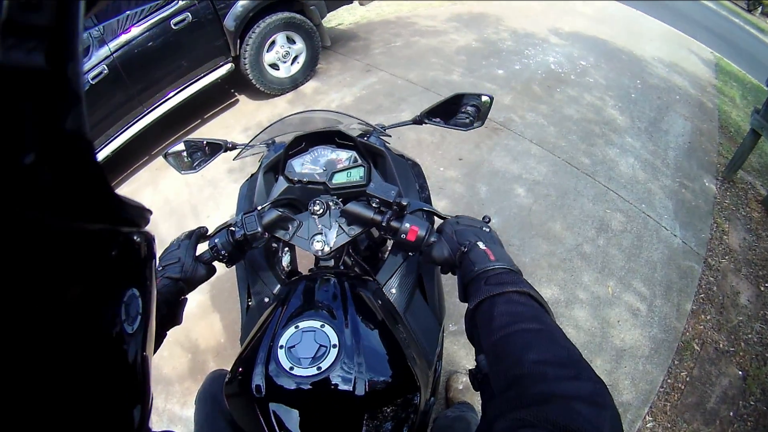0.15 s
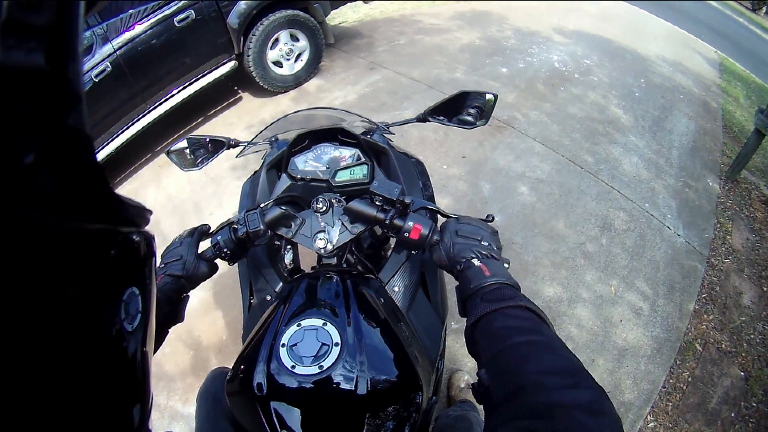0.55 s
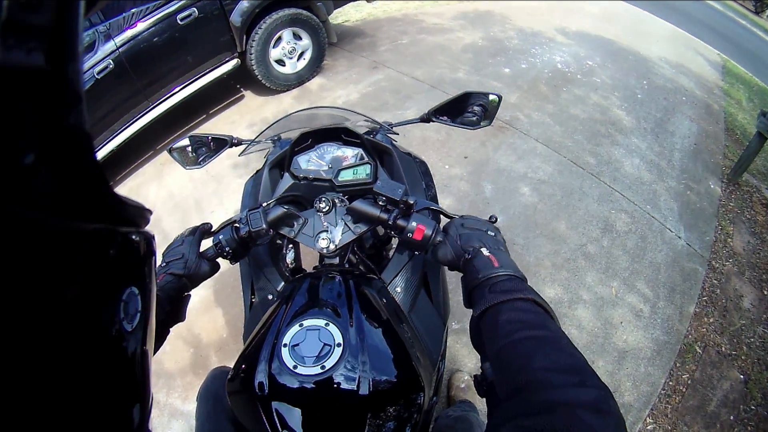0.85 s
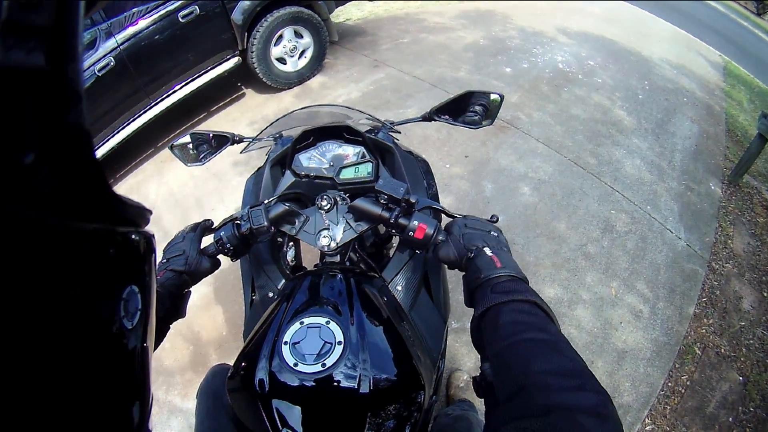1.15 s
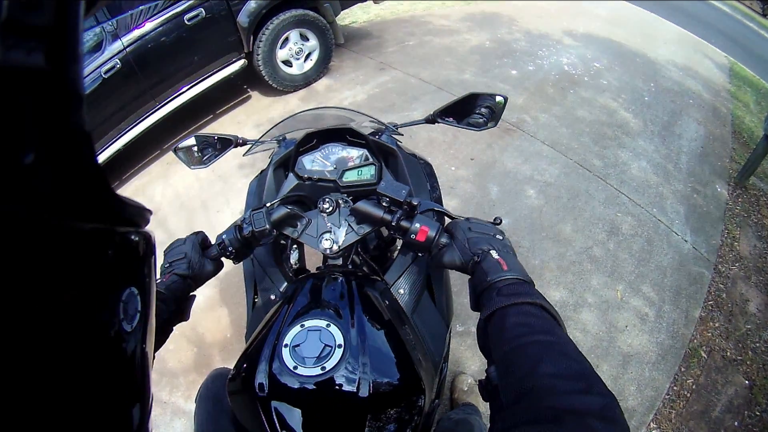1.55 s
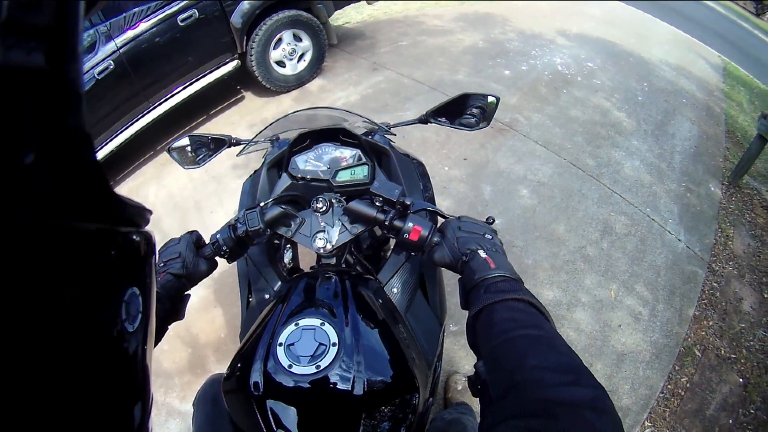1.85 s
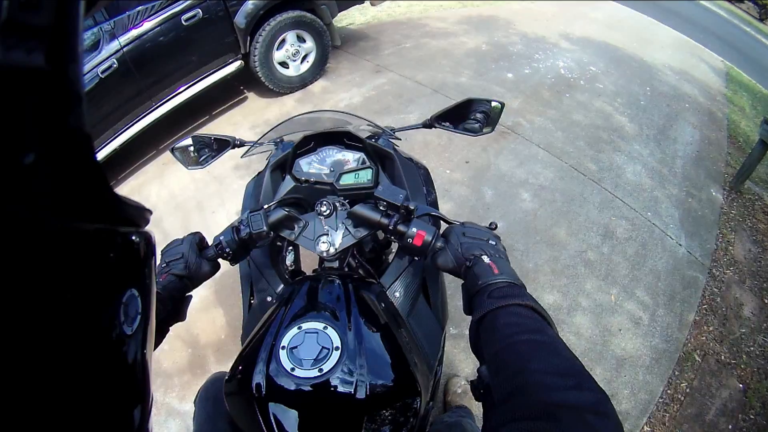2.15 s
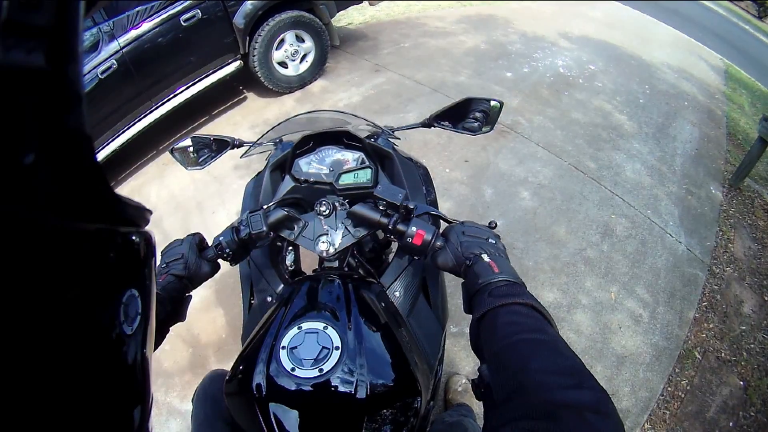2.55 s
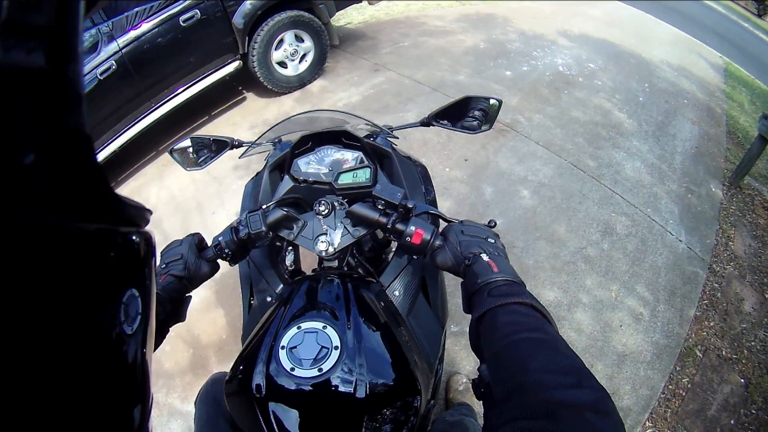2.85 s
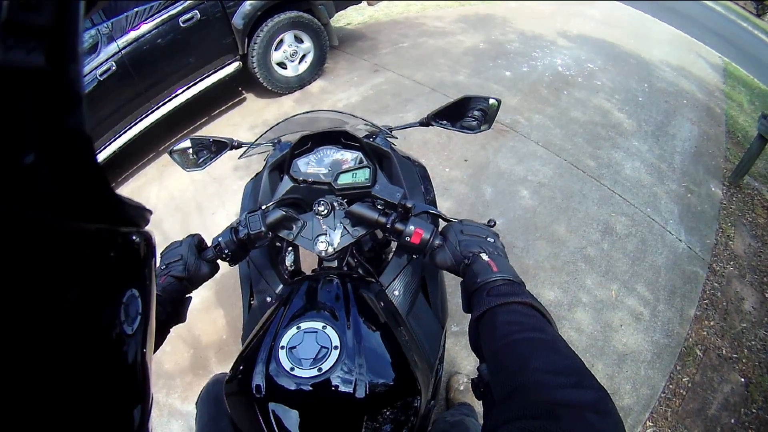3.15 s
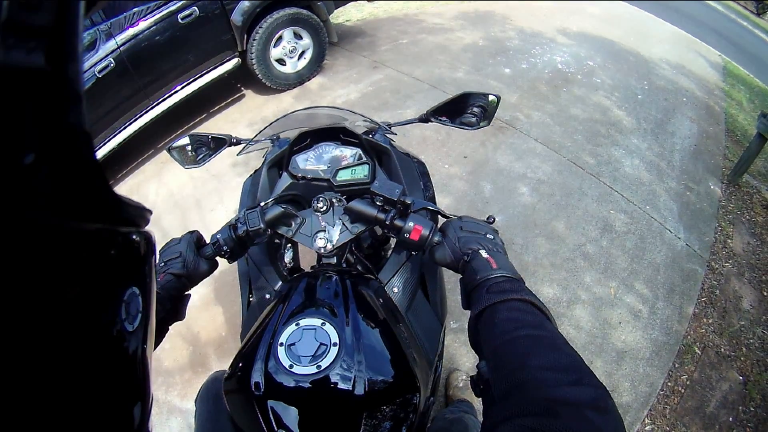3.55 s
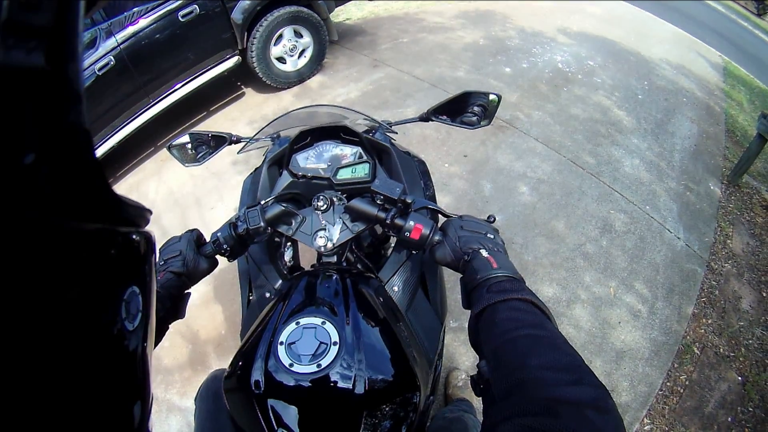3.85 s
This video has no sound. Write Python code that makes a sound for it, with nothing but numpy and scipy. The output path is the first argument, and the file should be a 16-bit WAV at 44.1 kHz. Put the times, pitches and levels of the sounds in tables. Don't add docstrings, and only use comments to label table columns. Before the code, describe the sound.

Close rider's-ear view of a twin-cylinder motorcycle: rattly idle, two barking revs, popping slow-down, short idle, then shutdown with switch clicks, cloth rubbing and faint bird whistles over low wind on an open driveway.

```python
import sys
import numpy as np
from scipy import signal
from scipy.fft import rfft, irfft
from scipy.io import wavfile
from scipy.ndimage import uniform_filter1d

SR = 44100
rng = np.random.default_rng(int(sys.argv[2]) if len(sys.argv) > 2 else 0)


def attenuation_scalar(level_db):
    decades = np.asarray(level_db, float) / 20
    return 10 ** decades


def store_pcm(level_fs):
    pcm = np.round(np.clip(level_fs, -1, 1) * 32767).astype(np.int16)
    wavfile.write(sys.argv[1], SR, np.atleast_2d(pcm).T)


N = 176400
TIME = np.arange(N) / SR
IDLE_DB = -26


def evened(x):
    return x / np.sqrt(np.mean(x ** 2) + 1e-20)


def curve(points):
    return np.interp(TIME, *np.transpose(points))


def filtered(x, order, hz, kind="low"):
    return signal.sosfilt(signal.butter(order, hz, kind, fs=SR, output="sos"), x)


def coloured(points):
    f, db = np.transpose(points)
    hz = np.fft.rfftfreq(N, 1 / SR)
    gain = attenuation_scalar(np.interp(np.log(hz + 1), np.log(f + 1), db))
    return evened(irfft(rfft(rng.standard_normal(N)) * gain, N))


def resonate(x, hz, width):
    turn = np.exp(2j * np.pi * hz * np.arange(len(x)) / SR)
    r = np.exp(-np.pi * width / SR)
    smooth = signal.lfilter([1], [1, -2 * r, r * r], x / turn)
    return evened((turn * smooth).real)


def ring(train, hz, t60, lag, swell=0.0018):
    t = np.maximum(np.arange(-441, SR // 2) / SR - lag, 0)
    tone = (1 - np.exp(-t / swell)) * attenuation_scalar(-60 * t / t60) * np.sin(2 * np.pi * hz * t)
    return signal.oaconvolve(train, tone)[441:N + 441]


def dip(train, width, lag):
    t = np.arange(-882, 883) / SR - lag
    return -signal.oaconvolve(train, np.exp(-.5 * (t / width) ** 2), "same")


# (t/s, speed/rpm)
CRANK_SPEED = [(0, 1571.9), (.401, 1562.3), (.5, 2177.4), (.673, 3332.2), (.908, 2340.4), (1.0, 3065.4),
               (1.12, 4050.4), (1.301, 3196), (1.498, 2384.8), (1.7, 1794), (1.85, 1506.3), (1.98, 1500.6),
               (2.1, 1584.4), (2.3, 1584.2), (2.556, 1629.7), (2.7, 905), (2.9, 240), (2.95, 0)]
# (t/s, level/dB)
FIRING_STRENGTH = [(0, -31.5), (.39, -30), (.45, -18), (.55, -14), (.64, -12.5), (.71, -19.5), (.845, -31),
                   (.875, -21), (.93, -19.5), (.98, -13.5), (1.08, -12), (1.15, -19), (1.3, -22),
                   (1.5, -23.5), (1.65, -30.5), (1.72, -25), (1.8, -29), (2.6, -31.5)]
# (from t/s, to t/s)
NO_FIRING = [
    (.709, .835),
    (.88, .915),
    (1.16, 1.3),
    (1.33, 1.353),
    (1.37, 1.425),
    (1.438, 1.487),
    (1.51, 1.57),
    (1.63, 1.65),
    (2.55, 4),
]


def crank():
    krpm, load_db = curve(CRANK_SPEED) / 1000, curve(FIRING_STRENGTH)
    cycle = .3755 + np.cumsum(krpm) * 1000 / 120 / SR
    first, second = [np.diff(np.floor(cycle - gap), prepend=np.floor(cycle[0] - gap - 1e-4))
                     for gap in (0, .243)]
    strokes = (first + second) * attenuation_scalar(0.1 * rng.standard_normal(N))
    cut = sum((TIME > a) & (TIME < b) for a, b in NO_FIRING) > 0
    fired = strokes * ~cut
    pumped = strokes * cut * attenuation_scalar(-1.5 * first)
    return krpm, load_db, fired, pumped


# (f/Hz, level/dB, t60/s, share of effort followed)
BOOM_TONES = [(53.75, 3.5, 0.19, 0), (104.8, -3.5, 0.089, 0)]
# (f/Hz, level/dB, t60/s, share of effort followed)
BARK_TONES = [(296.4, 5, 0.042, 0.6), (347.6, -3, 0.04, 1.374), (404, -17.5, 0.025, 1.58),
              (504.6, -21, 0.096, 1.2), (536, -23.5, 0.091, 1), (725, -25.5, 0.087, 1.64),
              (894, -31, 0.18, 0.46)]
# (f/Hz, level/dB, t60/s, rise/dB per 1000 rpm)
PUMP_TONES = [(54.2, -28, .35, 2.5), (100.7, -30.5, 0.075, 4.5), (149, -38, 0.076, 2.5),
              (260, -42, 0.066, 8), (320, -44.5, 0.075, 8)]
EARLIER_STROKES = (-.032, -.0135)


def exhaust(krpm, load_db, fired, pumped):
    effort_db, fast = load_db - IDLE_DB, krpm - 1.5
    pump_lag = .005
    out = dip(fired * attenuation_scalar(load_db - 1), .0008, 0)
    out += dip(pumped * attenuation_scalar(-24.5 + 2.5 * fast), .0025, pump_lag)
    out -= dip(fired * attenuation_scalar(load_db - 2.5), .0024, .0038)
    for hz, db, t60, share in BOOM_TONES:
        out += ring(fired * attenuation_scalar(IDLE_DB + db + share * effort_db), hz, t60, -0.0011)
    for hz, db, t60, share in BARK_TONES:
        out -= ring(fired * attenuation_scalar(IDLE_DB + db + share * effort_db), hz, t60, -0.00055, 0.0023)
    for hz, db, t60, rise in PUMP_TONES:
        out -= ring(pumped * attenuation_scalar(db + rise * fast), hz, t60, pump_lag - 0.092 / hz)
    out -= dip(pumped * attenuation_scalar(-20 + 3 * fast) * (krpm > 1.3), 0.0014, 0.00054)
    out = filtered(out, 2, 1100)
    for hz, db, t60, _ in BOOM_TONES:
        for start in EARLIER_STROKES:
            out += ring((TIME == 0) * attenuation_scalar(IDLE_DB + db + 0.5), hz, t60, start)
    return out


# (f/Hz, level/dB per Hz)
GAS_SPECTRUM = [(90, -28.5), (200, -7), (500, -16), (1000, -24.5), (2600, -41.5), (8000, -50.5),
                (13000, -56), (15600, -77)]


def gas_roar(krpm, load_db, puff):
    flow, flow_db = coloured(GAS_SPECTRUM), uniform_filter1d(load_db - IDLE_DB, 3000)
    low = signal.sosfiltfilt(signal.butter(1, 650, fs=SR, output="sos"), flow)
    roar = low * (1 + 0.45 * puff) * attenuation_scalar(0.76 * flow_db)
    hiss = (flow - low) * (1 + 0.37 * puff) * attenuation_scalar(0.26 * flow_db + 0.61 * (krpm + 2.5))
    return (roar + hiss) * attenuation_scalar(-49.5 + (krpm - 1.5))


def ticking():
    crowd = evened(uniform_filter1d(rng.standard_normal(N), 250))
    return rng.standard_normal(N) * attenuation_scalar(2 * crowd)


# (f/Hz, width/Hz, level/dB)
METAL_PARTS = [(1390, 200, -71), (1760, 120, -73), (2200, 300, -73.5), (3760, 350, -71.5), (3956, 350, -72),
               (5230, 380, -79), (10040, 1800, -75.5)]


def metal(krpm):
    ticks = ticking()
    ringing = sum(attenuation_scalar(db) * resonate(ticks, hz, width) for hz, width, db in METAL_PARTS)
    return ringing * attenuation_scalar(5 * (krpm - 2.0))


# (from t/s, fading t/s, end t/s, f/Hz, width/Hz)
CHATTER_SPELLS = [
    (0, 0.393, 0.48, 1390, 204),
    (0, .45, 0.78, 1710, 280),
    (1.627, 1.995, 2.25, 1780, 260),
]
CHATTER_LEVELS = (-62.5, -63.5, -60)


def chatter(puff):
    ticks, out = ticking(), 0
    for (start, fading, end, hz, width), db in zip(CHATTER_SPELLS, CHATTER_LEVELS):
        shape = np.interp(TIME, [start - .03, start, fading, end], [0, 0.86, 0.74, 0.013])
        out = out + attenuation_scalar(db) * shape * (1 + 0.5 * puff) * resonate(ticks, hz, width)
    return out


def engine():
    krpm, load_db, fired, pumped = crank()
    turning = np.clip(uniform_filter1d(krpm, 4410) / 1.91, 0, 1) ** 0.72
    puff = signal.oaconvolve(fired, np.exp(-np.arange(2000) / SR / 0.023))[:N]
    moving = turning * (gas_roar(krpm, load_db, puff) + metal(krpm))
    return exhaust(krpm, load_db, fired, pumped) + moving + chatter(puff)


# (f/Hz, level/dB per Hz)
AIR_SPECTRUM = [(12, -34.5), (24, -1), (50, -3), (80, -15.5), (130, -18.5), (360, -28.5), (1680, -47.5),
                (15600, -55.5)]
# (f/Hz, width/Hz, level/dB)
FAR_DRONE = (82, 6, -65.5)


def air():
    noise = coloured(AIR_SPECTRUM)
    low = filtered(noise, 2, 300)
    gust = attenuation_scalar(1.1 * evened(uniform_filter1d(rng.standard_normal(N), 3500)))
    hz, width, db = FAR_DRONE
    drone = attenuation_scalar(db) * resonate(rng.standard_normal(N), hz, width)
    return attenuation_scalar(-56.5) * (noise - low + low * gust) + drone


def burst(start, db, length, body, rise=0.0032, hold=0):
    t, out = np.arange(SR // 2) / SR, np.zeros(N)
    lumps = evened(uniform_filter1d(rng.standard_normal(len(t)), 90))
    grit = rng.standard_normal(len(t)) * attenuation_scalar(1.9 * lumps)
    shape = np.minimum(t / rise, 1) * attenuation_scalar(db - 20 * np.maximum(t - hold, 0) / length)
    sound = sum(attenuation_scalar(gain) * resonate(grit, hz, width) for hz, width, gain in body)
    out[round(start * SR):][:len(t)] = shape * sound
    return out


# (t/s, level/dB, length/s, brightness 0-1)
SWITCH_CLICKS = [
    (2.549, -57.5, 0.024, 1),
    (2.569, -56.5, 0.018, .85),
    (2.802, -55, 0.032, 0.85),
    (2.912, -53.5, 0.025, 0.77),
    (3.03, -54, 0.018, 0),
    (3.242, -77.5, 0.068, 1),
]
# (f/Hz, width/Hz, level/dB)
SWITCH_BODY = [(1700, 500, 0), (3000, 1200, 0), (4800, 2200, -3), (7000, 3500, -4), (11800, 1600, -12)]


def switches():
    out = 0
    for start, db, length, bright in SWITCH_CLICKS:
        body = [(hz, width, gain - 10.0 * (1 - bright) * np.log2(hz / 1700) ** 2)
                for hz, width, gain in SWITCH_BODY]
        out = out + burst(start, db, length, body)
    return out


# (t/s, level/dB, held/s)
SCUFFS_AND_RATTLE = [
    (2.55, -55.5, 0.027),
    (2.62, -68.5, 0.13),
    (2.916, -60.5, 0.062),
    (2.994, -66.5, 0.042),
]
# (f/Hz, width/Hz, level/dB)
SCUFF_BODY = [(450, 350, -3), (800, 400, 0), (1350, 450, -1), (1900, 500, -9)]


def scuffs():
    return sum(burst(start, db, .04, SCUFF_BODY, rise=0.004, hold=held)
               for start, db, held in SCUFFS_AND_RATTLE)


# (t/s, length/s, from f/Hz, to f/Hz, level/dB)
BIRD_WHISTLES = [
    (3.778, 0.1, 4150, 4100, -78),
    (3.807, 0.11, 5050, 4870, -80),
    (3.87, .06, 4300, 3250, -78),
]


def bird():
    out = 0
    for start, length, from_hz, to_hz, db in BIRD_WHISTLES:
        u = np.clip((TIME - start) / length, 0, 1)
        waver = 1 + 0.041 * evened(uniform_filter1d(rng.standard_normal(N), 200))
        hz = (from_hz + (to_hz - from_hz) * u) * waver
        out = out + attenuation_scalar(db) * np.sin(np.pi * u) * np.sin(2 * np.pi * np.cumsum(hz) / SR)
    return out


def reflections(dry):
    taps = rng.choice([-1., 1.], 8000) * (rng.random(8000) < .04)
    taps = taps * attenuation_scalar(-60 * np.arange(8000) / SR / 0.36)
    wet = signal.oaconvolve(dry, taps / np.linalg.norm(taps))[:N]
    return attenuation_scalar(-9.5) * filtered(wet, 2, 200, "high")


def scene():
    dry = engine() + switches() + scuffs() + bird()
    return (dry + reflections(dry) + air())[None]


def top_cut(x):
    return signal.sosfilt(signal.butter(12, 15710, fs=SR, output="sos"), x)


def record(dry):
    padded = np.pad(dry, ((0, 0), (SR // 10, 0)))
    low_cut = signal.butter(2, 34, "high", fs=SR, output="sos")
    mix = signal.sosfiltfilt(low_cut, padded)[:, -N:]
    return top_cut(mix)


dry = scene()
out = record(dry)
store_pcm(out)
```